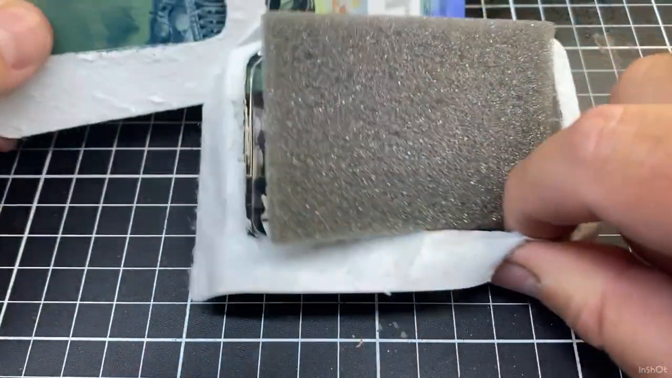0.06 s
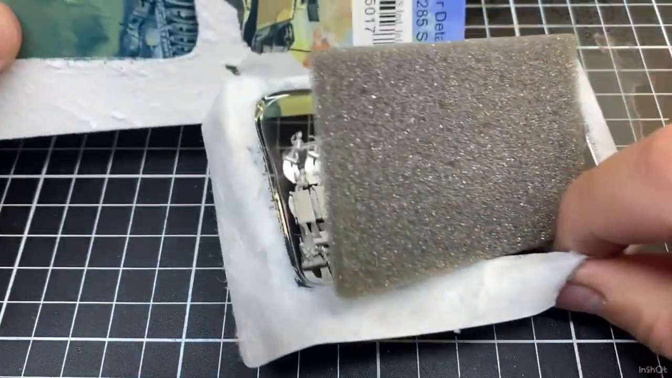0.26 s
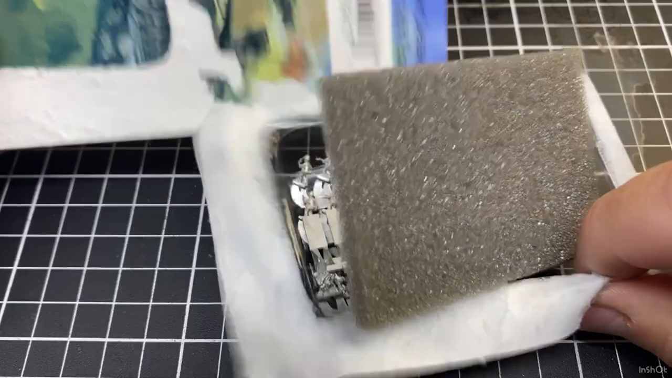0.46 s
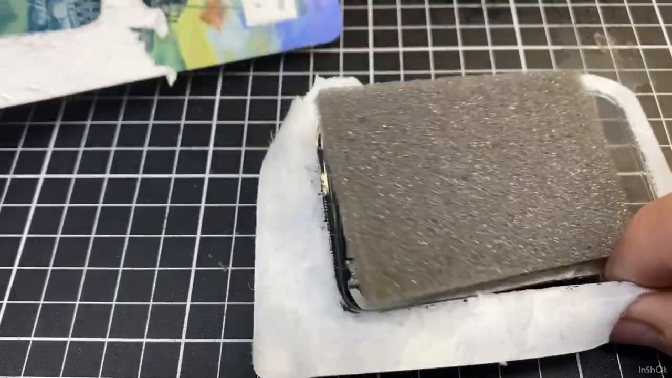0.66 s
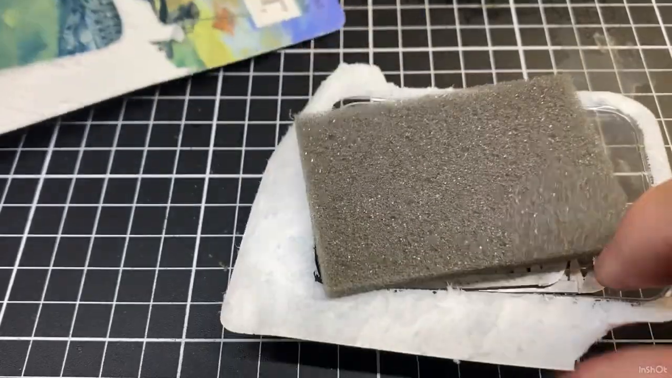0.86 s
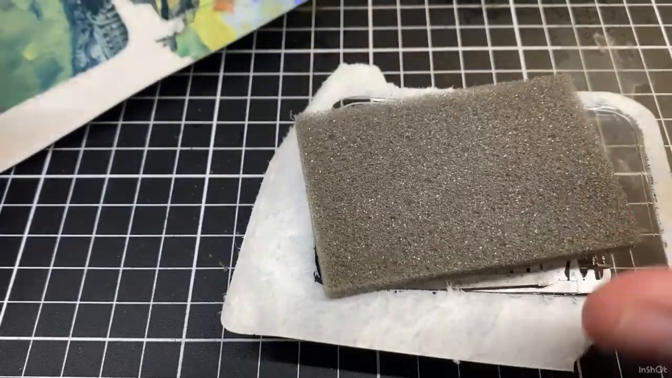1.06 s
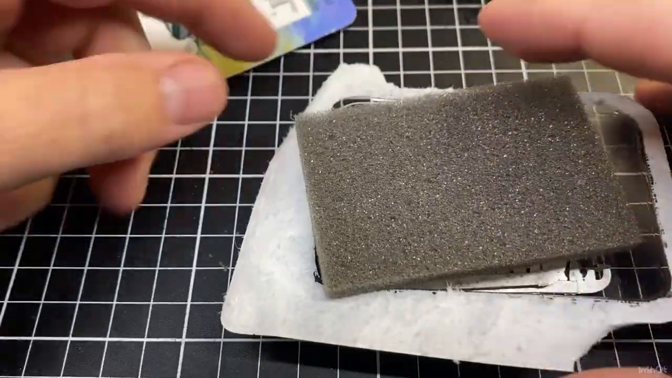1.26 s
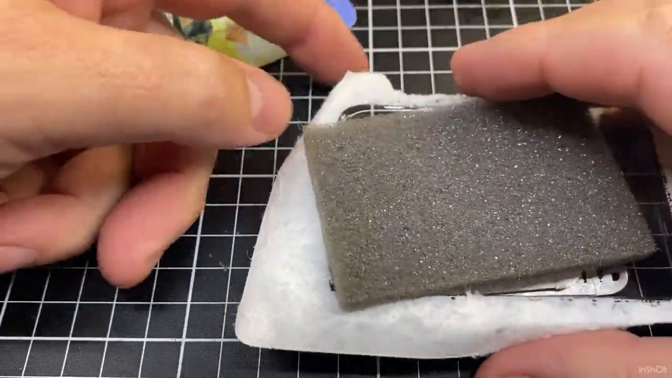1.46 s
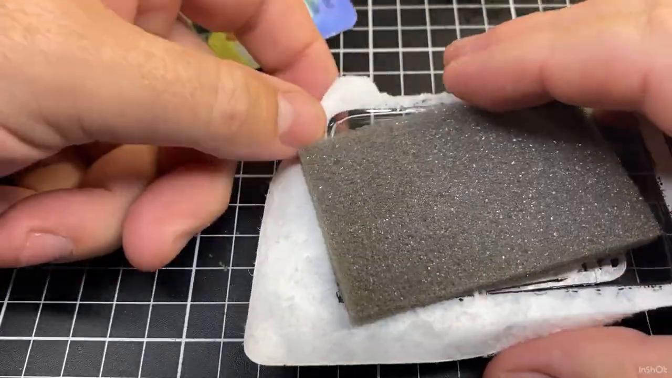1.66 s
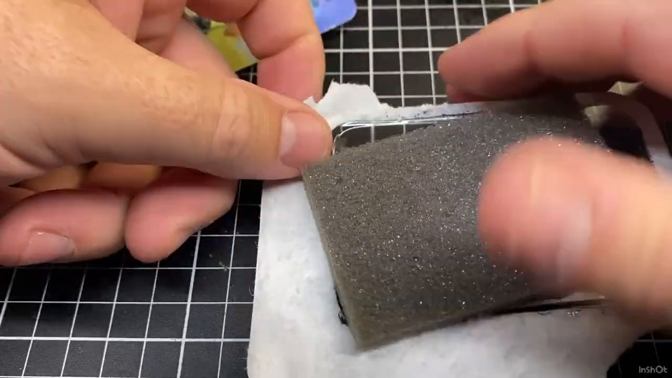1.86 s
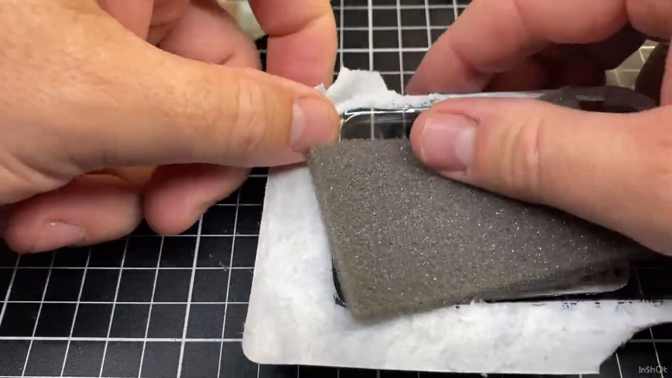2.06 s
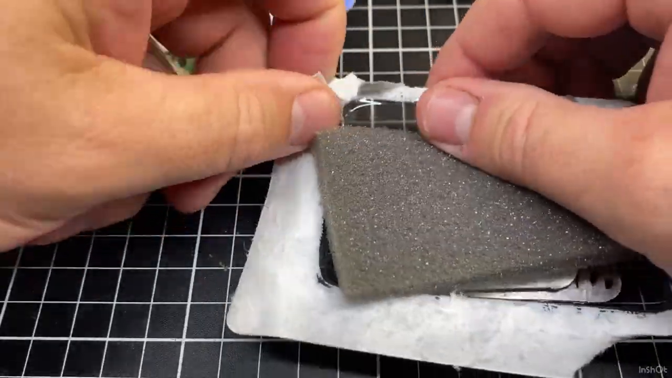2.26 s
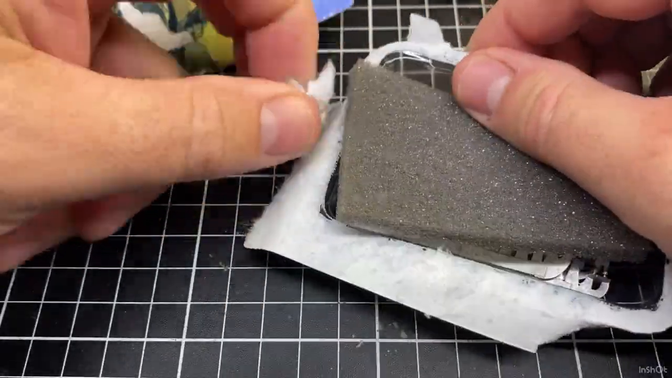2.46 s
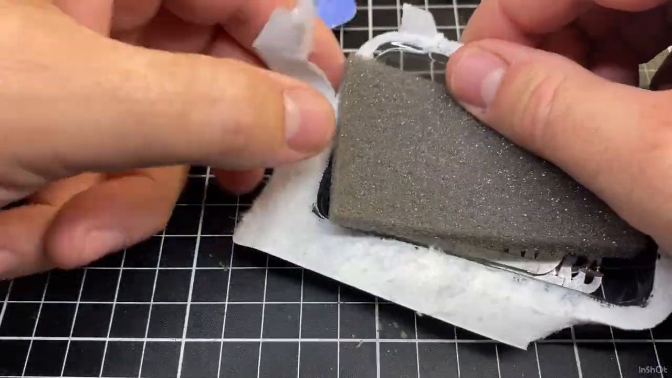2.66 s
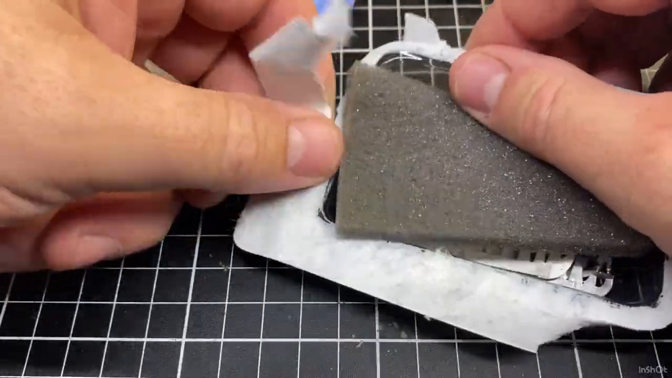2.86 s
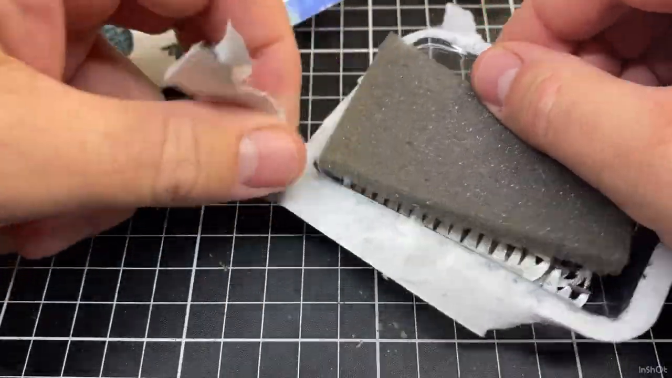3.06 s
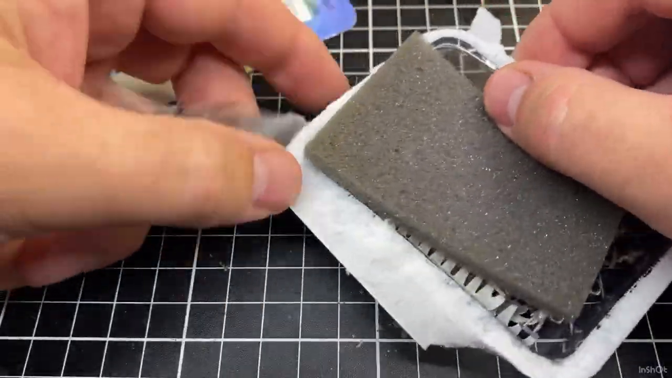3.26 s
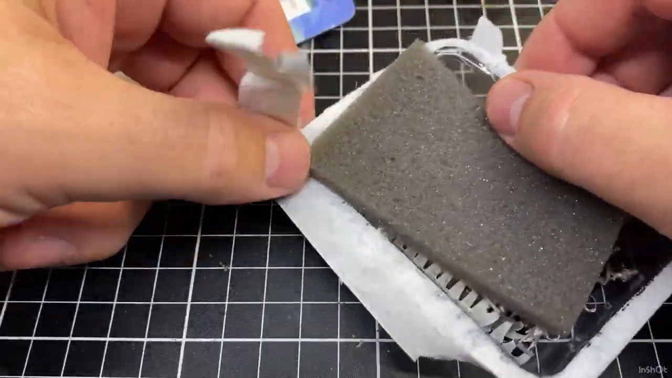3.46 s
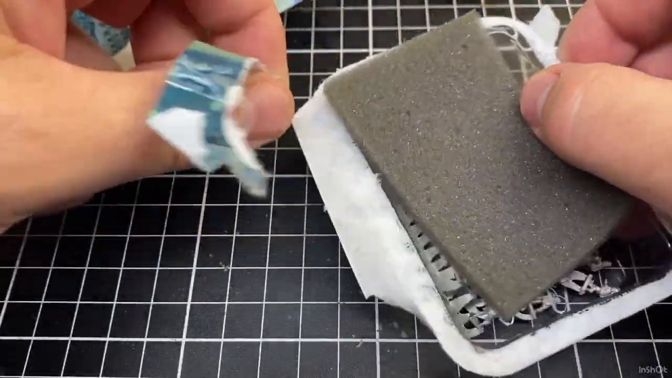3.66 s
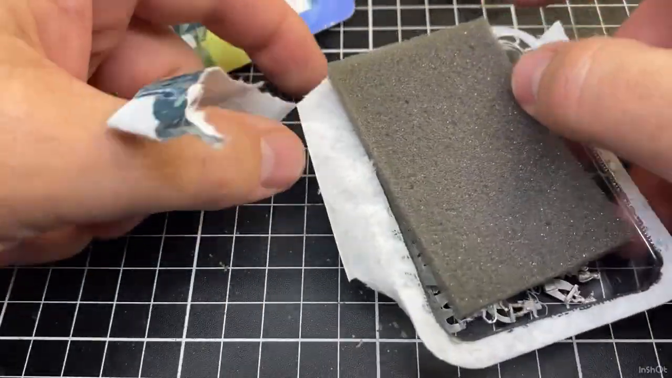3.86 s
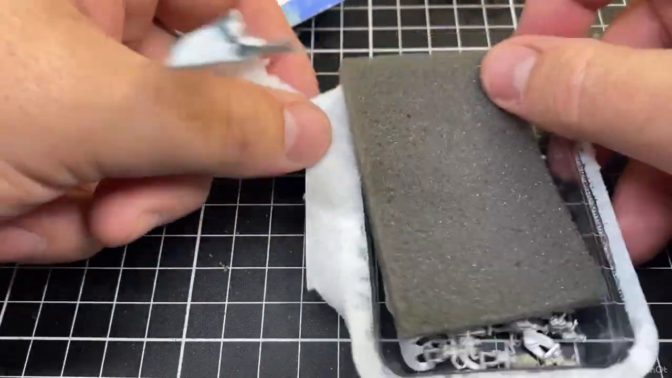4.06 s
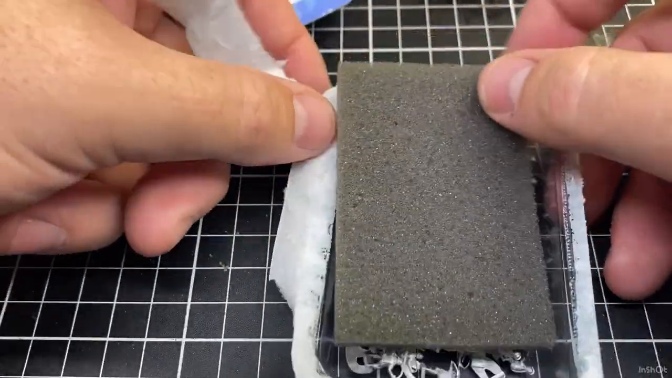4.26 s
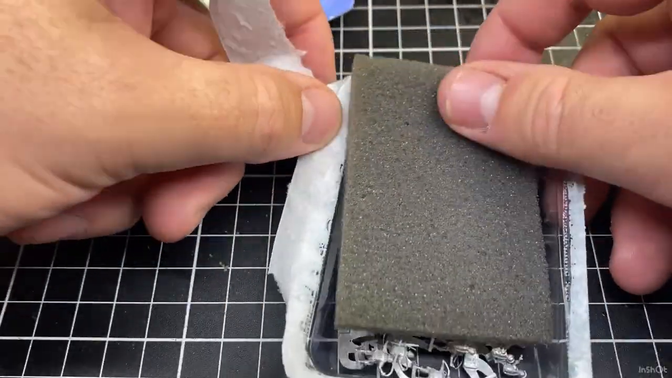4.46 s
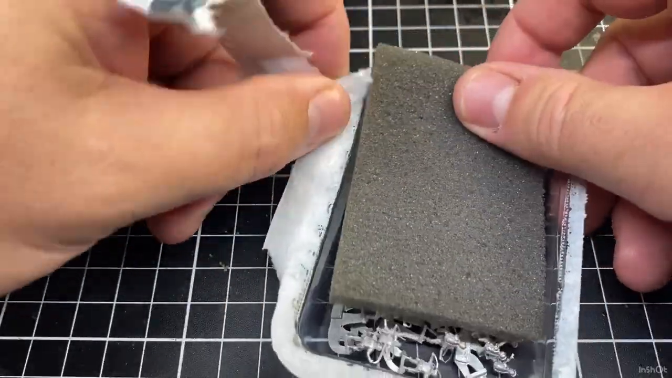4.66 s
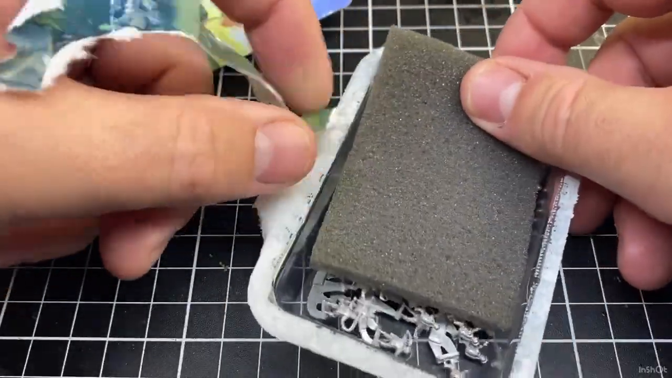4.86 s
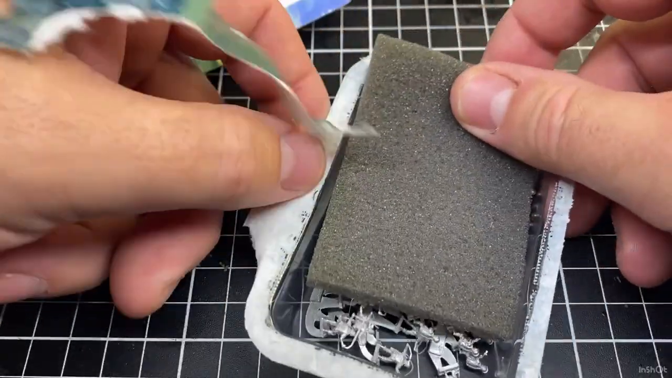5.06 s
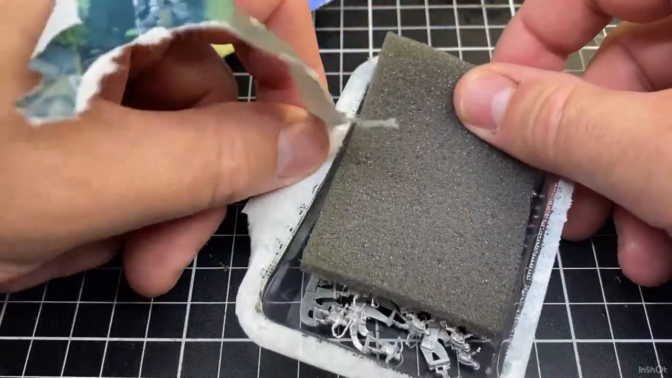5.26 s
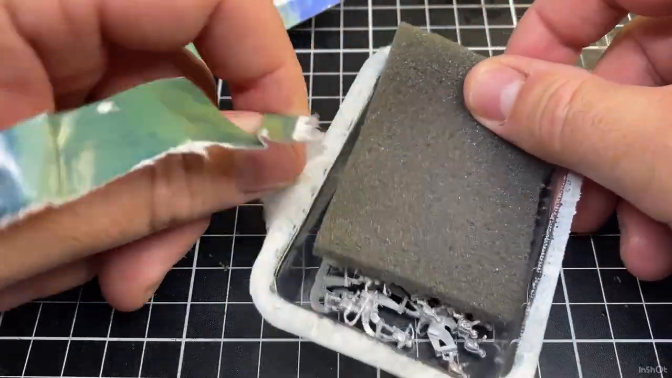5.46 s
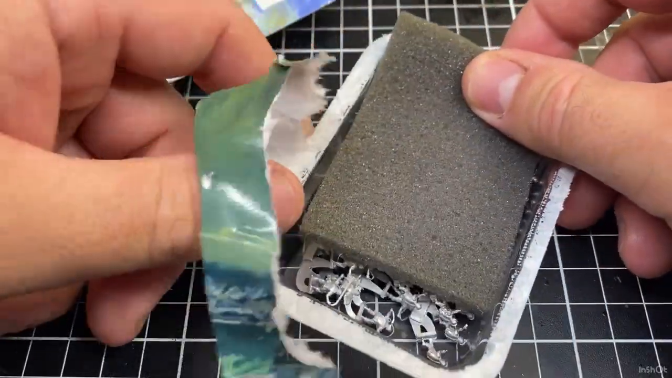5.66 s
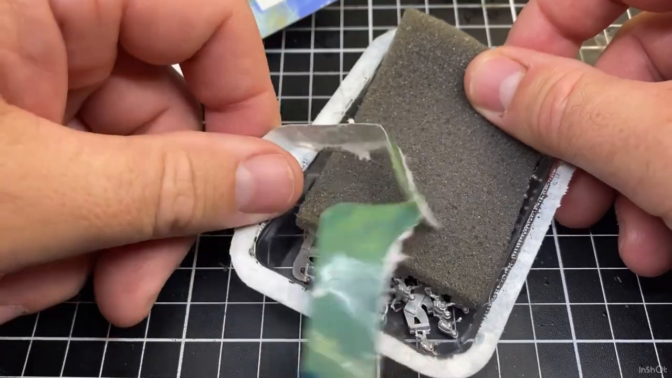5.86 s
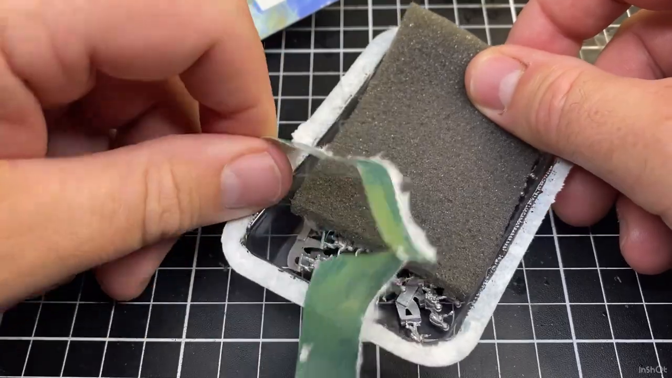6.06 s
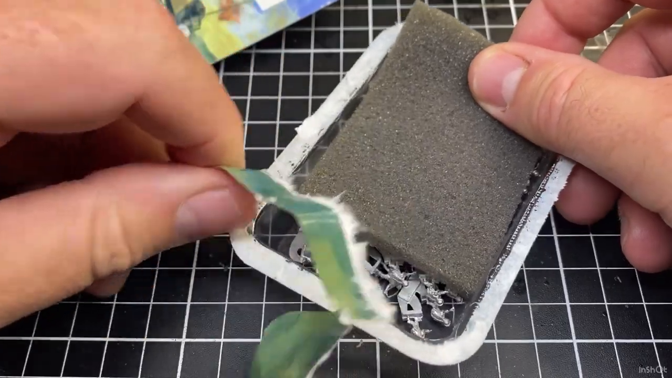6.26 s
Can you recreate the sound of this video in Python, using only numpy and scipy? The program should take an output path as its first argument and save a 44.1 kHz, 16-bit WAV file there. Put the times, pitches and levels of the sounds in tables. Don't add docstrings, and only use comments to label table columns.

```python
import sys
import numpy as np
from scipy import signal
from scipy.fft import rfft, irfft, next_fast_len
from scipy.io import wavfile
from scipy.ndimage import uniform_filter1d, map_coordinates

SR = 44100
rng = np.random.default_rng(int(sys.argv[2]) if len(sys.argv) > 2 else 0)


def decibels_to_gain(level_db):
    exponent = np.asarray(level_db, float) / 20
    return 10 ** exponent


def int16_out(signal):
    q = np.round(np.clip(np.atleast_2d(signal).T, -1, 1) * 32767)
    wavfile.write(sys.argv[1], SR, q.astype(np.int16))


N = 277830

# f/Hz, density/dB
ROOM_FLOOR = [(15, -33.5), (25, -11.5), (53, 7.5), (74, -9.5), (108, 1), (161, -23), (195, -10.5),
              (229, -42.5), (293, -9.5), (326, -42.5), (439, -32.5), (476, -27.5), (16000, -59)]
# t/s, level/dB
RUMBLE_SWAY = [(0, 5.5), (1.2, 1), (1.7, -5), (2.0, -5), (2.3, 7), (2.9, -6), (3.15, 4), (3.45, 6.5),
               (3.7, -3), (4.1, -0.5), (4.7, -1), (5.15, -7), (5.5, -3), (6.3, -2.5)]
# f/Hz, width/Hz, level/dB
HUM_MODES = [(95.8, 62, 1.5), (293, 4.4, 1)]
# t/s, level/dB
DRONE_LEVEL = [
    (0, -57.5),
    (1.1, -67.5),
    (3.4, -61),
    (3.9, -55.5),
    (4.7, -72),
    (6.3, -78),
]
# f/Hz, t60/s
ROOM_DECAY = [(200, 0.16), (2000, 0.5), (8000, 0.047), (15000, 0.19)]

# t/s, peak level/dB, f/Hz, t60/s
TRAY_BUMPS = [(0.004, -37, 75.5, 0.23), (0.077, -34, 117, 0.11), (0.189, -41.5, 66, 0.39),
              (0.278, -29.5, 83.4, 0.057), (0.365, -34.5, 82.5, 0.15), (0.472, -22, 77.5, 0.12),
              (0.509, -23, 49.7, 0.17), (0.568, -40.5, 53.8, 0.12), (0.712, -48.5, 65, 0.31),
              (0.849, -36.5, 60, 0.2), (0.938, -35.5, 54.1, 0.085), (3.538, -40, 59.2, 0.15),
              (3.743, -41.5, 88.8, 0.11), (5.421, -44.5, 59.2, 0.14), (.714, -38.5, 140, 0.086),
              (.365, -36, 169.7, .08), (.19, -41, 151.5, .1), (0.733, -44.5, 63.5, 0.27),
              (3.758, -46, 198, .12), (.813, -46.5, 91, .15), (0.927, -44, 146, 0.12),
              (1.813, -49, 106, 0.13), (2.708, -50, 62, 0.24), (2.845, -46, 190, 0.14),
              (3.137, -48, 77, 0.21), (4.083, -44, 51.4, .2), (4.579, -46, 104, 0.15),
              (5.419, -53, 252, 0.043)]
# f/Hz, density/dB
DRAG_TONE = [(60, -16.5), (150, 0), (300, 2), (600, -11), (1200, -44.5)]

# t/s, peak level/dB, brightness/dB per octave
CARD_KNOCKS = [
    (.806, -33.5, -2),
    (.882, -33, -3.5),
    (0.898, -37, 0.5),
    (0.923, -31, -5),
    (.934, -25.5, 1),
    (.943, -24, 0.5),
]
# f/Hz, level/dB, t60/s
LOOSE_CARD_MODES = [(980, -2, .018), (1280, -7, .015), (1650, 0, .015), (2100, 0, .015), (2400, -5, .014),
                    (2750, -8, .014), (3300, -9, .013), (4300, -18, .01)]
# t/s, peak level/dB, f/Hz,
# t60/s
TRAY_TAPS = [(1.5735, -32, 860, 0.019), (1.585, -30, 770, 0.013), (1.593, -31, 845, 0.018),
             (1.605, -30.5, 860, 0.022), (1.817, -26.5, 1250, 0.026), (1.818, -37.5, 550, 0.023),
             (4.382, -54.5, 910, 0.035), (4.495, -53, 900, .02), (4.5702, -36, 410, 0.048),
             (4.755, -44, 780, 0.023), (4.765, -43, 490, 0.023), (4.805, -44.5, 783, 0.022),
             (4.836, -42, 770, 0.017), (4.885, -35, 900, 0.01), (5.64, -27, 5740, 0.016),
             (5.645, -24, 1560, 0.021), (2.402, -41, 840, 0.015), (2.2, -46.5, 430, 0.051),
             (1.627, -37, 890, 0.021), (1.329, -52, 2000, 0.02), (1.764, -40, 945, 0.04),
             (4.132, -30.5, 960, 0.011), (3.157, -38, 2840, 0.017), (4.572, -37, 615, .03)]

# t/s, peak level/dB, tray ring level/dB, ring f/Hz, fizz level/dB
CARD_BREAKS = [(.0064, -14, -10, 1570, -9.5), (0.034, -30.5, -16.5, 3480, 0.5),
               (0.074, -12, -12, 3580, -6.5), (0.175, -23.5, -27.5, 3890, -15),
               (0.3634, -22.5, -6, 740, -5.5), (0.41, -23, -15.5, 1400, -6.5),
               (0.4286, -19.5, -10.5, 876, -5.5), (0.471, -5.5, -6.5, 1350, -8.5),
               (0.473, -10.5, -15, 3080, -6), (0.5462, -16, -9.5, 2460, -19), (0.7091, -32, -1, 963, -12.5),
               (.8405, -19, -12, 2640, -13.5)]
# t/s, peak level/dB, ring level/dB, fizz level/dB, burst t60/s
WALL_SNAPS = [(1.5853, -34, -18, -13, 0.0077), (1.8172, -9.5, -42, -11.5, 0.0084),
              (2.4755, -36.5, -24, 0.5, 0.064), (2.918, -8, -14.5, -16.5, 0.013),
              (2.9417, -28.5, -36.5, -8, 0.015), (3.2692, -36, -10, 3, 0.022),
              (3.5935, -25.5, -4, -5, 0.0087), (3.676, -20, -18, -5, 0.0098),
              (3.7402, -17.5, -6.5, -8, 0.016), (4.573, -12, -15.5, -5, 0.038),
              (4.615, -26, -21, -6.5, .013), (4.666, -23.5, -17, -3, 0.0058),
              (5.1921, -20, -21, -2.5, 0.024), (5.248, -14.5, -20, -1, 0.0074),
              (5.339, -30, -12, -28, 0.0095), (5.6477, -9.5, -12, -11, 0.01),
              (5.9574, -11.5, -14, -14.5, 0.0065), (5.9873, -19.5, -12.5, -7.5, 0.028),
              (6.1742, -15.5, -10, -8.5, 0.015)]
# t/s, peak level/dB, ring level/dB, fizz level/dB, burst t60/s
FLANGE_SNAPS = [(2.2034, -12.5, -5, -5, 0.018), (2.3167, -30, -19, -13, 0.022),
                (2.8522, -12.5, -12.5, -1, 0.025), (3.4277, -21.5, -44, -11.5, 0.0086),
                (3.4835, -13.5, -25, -4, 0.011), (3.5395, -19.5, -13.5, -5, 0.022),
                (3.6561, -28, -33, -1, 0.022), (3.9842, -23.5, -13.5, -11.5, 0.02),
                (4.2044, -30.5, -32, -21, 0.0094), (4.5699, -15.5, -26, -11, 0.0094),
                (4.7033, -25, -15.5, -6.5, 0.033), (5.1721, -41.5, -30, 13, 0.011),
                (5.3021, -25, -22, -6, 0.012), (5.3946, -19.5, -26, 4.5, .008),
                (5.4258, -9, -9, -6.5, 0.0094), (5.8057, -33.5, -6, 0.5, 0.021),
                (5.9783, -15, -3.5, -8.5, 0.0043), (6.1015, -39.5, -30, -4.5, 0.019),
                (6.2163, -26, -11, -19.5, .012), (6.2744, -20.5, -8.5, -11.5, 0.035)]
# t/s, peak level/dB
RIP_TICKS = [(2.2131, -12), (2.2201, -10.5), (2.242, -15), (2.2784, -22), (2.341, -9.5), (0.456, -21.5),
             (2.293, -13), (2.811, -27.5), (3.547, -12), (3.64, -28), (2.818, -14.5), (2.882, -29),
             (3.4775, -22), (5.4705, -10)]
# t/s, peak level/dB, ring f/Hz
FIBRE_SPIKES = [(0.0448, -21.5, 5200), (0.0511, -18, 6700), (0.2575, -23.5, 3430), (0.2692, -23.5, 3660),
                (0.2845, -18, 3560), (0.782, -44, 2584), (2.3166, -16.5, 7030), (2.3216, -13.5, 6450),
                (2.3665, -19.5, 7100), (2.377, -12.5, 6350), (2.3834, -15.5, 6700), (2.4023, -18, 6780),
                (2.4055, -21, 6200), (2.8951, -20, 3400), (2.9773, -15, 4100), (3.1124, -39.5, 3310),
                (3.1228, -30, 6750), (3.4054, -26.5, 3150), (3.5594, -16, 6470), (3.6094, -23, 5330),
                (4.219, -23.5, 4800), (4.2766, -40.5, 5480), (4.4894, -34.5, 2990), (5.1206, -27, 6900),
                (5.3725, -18.5, 6200), (5.4112, -16, 2900), (5.4326, -15, 3200), (5.4564, -15, 6050),
                (5.4894, -31, 3090), (6.0484, -26, 7130), (6.1474, -27.5, 5440), (6.2882, -18.5, 5470)]

# t/s, level/dB
HAND_HOLD = [(0, -42.5), (.36, -49), (.45, -61), (.92, -71), (.99, -74.5), (1.19, -96.5), (1.29, -88.5),
             (1.31, -65), (1.54, -74.5), (1.98, -68.5), (2.09, -59.5), (2.54, -65.5), (2.62, -60),
             (3.91, -73), (3.98, -61), (4.33, -69), (4.56, -60.5), (4.96, -76)]
# t/s, length/s, start level/dB, end level/dB
STEADY_TEARS = [(.02, .064, -57.5, -33), (.084, .08, -35.5, -49.5), (.164, 0.099, -37.5, -44),
                (.255, 0.05, -38, -39), (.408, 0.029, -43, -43.5), (.455, 0.04, -39.5, -40),
                (.471, 0.057, -22, -27.5), (1.544, 0.049, -79, -50), (1.669, .06, -53.5, -60.5),
                (1.729, 0.08, -46, -57), (2.092, .112, -62.5, -46), (2.232, .12, -42, -33),
                (2.304, .106, -26.5, -32), (2.73, 0.14, -57.5, -43.5), (2.945, .097, -41.5, -40),
                (3.357, 0.14, -50, -56), (3.477, .056, -44, -41), (3.53, 0.014, -36, -29),
                (3.625, .055, -43.5, -42), (.3, 0.07, -48, -45.5), (3.984, .031, -46, -42.5),
                (4.015, .131, -57, -51), (4.202, .124, -50.5, -57), (4.562, 0.014, -49, -23),
                (4.678, 0.097, -42.5, -36.5), (5.0, 0.071, -61.5, -49.5), (5.168, .157, -51.5, -38.5),
                (5.325, .1, -42, -36), (5.425, .049, -30, -30), (5.587, .068, -54.5, -36),
                (5.779, .076, -60, -48.5), (6.102, .166, -46, -41), (6.268, 0.035, -43, -39)]
# t/s, start level/dB, fall/dB per s
SUDDEN_SLIPS = [(0, -29.5, 774.5), (0.359, -31.5, 479.5), (0.525, -39, 169), (.701, -61.5, 17),
                (0.84, -42, 261), (1.396, -64, 87.5), (1.595, -50, 308), (1.813, -45.5, 352),
                (1.872, -62.5, 88), (2.205, -37, 317), (2.41, -44, 243), (2.474, -47.5, 285),
                (2.613, -44, 215), (2.822, -46.5, 25), (3.039, -53.5, 26), (3.264, -43.5, 225),
                (3.546, -28.5, 477), (3.592, -31.5, 297), (3.74, -37.5, 406), (3.77, -58.5, 127),
                (4.575, -34, 278), (4.763, -42, 378), (4.828, -51.5, 231), (5.1, -46.5, 212),
                (5.476, -37, 447), (5.515, -55.5, 97), (5.654, -54.5, 105), (5.855, -63, 147.5),
                (5.983, -44, 66), (6.038, -39.5, 254), (0.781, -53, 450), (0.949, -64.5, 125),
                (1.305, -66.5, 119.5), (3.68, -49, 167), (5.07, -53.5, 58), (.44, -49, 100)]
# t/s, tray level/dB, tension level/dB
TRAY_GRIP = [(0, -3.5, -5), (.47, -1, 0.5), (.56, 2.5, -5.5), (.92, -0.5, -6), (1.58, 2.5, -2),
             (1.69, -7, -4.5), (1.83, 6, -3), (2.15, -4.5, 6.5), (2.36, -13.5, -7), (2.5, -5, -6),
             (3.0, -0.5, 1.5), (3.6, -4.5, -2.5), (3.85, 3.5, -2), (4.6, -7.5, 3), (4.9, -1.5, -4),
             (5.25, -14, 5.5), (5.52, -0.5, -5), (6.15, -9.5, 2)]
# t/s, length/s, f/Hz, level over the paper/dB
STRIP_TONES = [(0.172, .07, 1630, -8.5), (0.258, 0.051, 3700, -4.5), (.26, .04, 1510, -4),
               (0.355, .03, 600, -7.5), (0.479, 0.038, 2880, -8.5), (2.211, .03, 3200, 6),
               (2.293, 0.064, 1800, -6.5), (2.33, 0.082, 6960, -1), (2.967, 0.077, 3000, -4),
               (3.533, .04, 4050, -6), (3.592, 0.045, 4200, -4.5), (3.613, 0.067, 1160, -5),
               (4.696, 0.043, 1410, -1), (4.726, 0.041, 2200, -5), (5.232, 0.045, 980, -8),
               (5.41, 0.069, 2970, -6), (6.133, .04, 5560, -14), (6.198, .1, 3150, -4),
               (1.302, 0.089, 1790, 0.5), (0.949, .12, 1950, 4), (1.736, .05, 2000, -1),
               (2.78, .04, 2320, -1)]
# f/Hz, density/dB
PAPER_TONE = [(2500, -42), (4200, -17), (5200, -4), (7400, 0), (8500, 5.5), (9500, -6), (11000, -26)]
# f/Hz, density/dB
FIZZ_TONE = [(7500, -30), (9500, 1), (11000, 1), (12200, 0.5), (14000, -0.5), (15700, -4), (16700, -27.5)]
# f/Hz, width/Hz, level/dB
LOW_TRAY_MODES = [(802, 380, 3), (1015, 302, 6.5), (1470, 736, 0.5), (2080, 580, 3.5)]
# f/Hz, width/Hz, level/dB
HIGH_TRAY_MODES = [(2556, 884, -1.5), (3308, 650, 0.5), (3900, 1120, -5)]

# f/Hz, likeness/0-1
PORT_LIKENESS = [(60, .97), (220, .7), (1000, .4), (1800, .4), (3000, .65), (5500, .6), (6700, .95),
                 (7600, .8), (8500, 1), (9600, 1), (10500, .8), (11900, 1), (12900, 1), (13800, .7),
                 (14700, 1)]
# f/Hz, lead/rad
PORT_LEAD = [(0, 0), (300, -.5), (5900, -.4), (6500, 0), (6900, .2), (7300, 1.4), (8500, np.pi),
             (9600, np.pi), (10000, 4), (11900, 2 * np.pi), (12900, 2 * np.pi), (13400, 7.4),
             (14700, 3 * np.pi)]
# f/Hz, level/dB
PORT_TILT = [(60, -2), (200, -6), (700, -8.5), (1300, -3), (3000, -7), (5200, -6), (6500, -1), (8000, 0)]


def unit(x):
    return x / np.sqrt(np.mean(x ** 2) + 1e-20)


def noise():
    return rng.standard_normal((2, N))


def span(s, length):
    return slice(round(s * SR), round((s + length) * SR))


def along(points, hz):
    f, value = np.transpose(points)
    return np.interp(np.log(hz + 1), np.log(f + 1), value)


def spectrum(points):
    return lambda hz: decibels_to_gain(along(points, hz))


def curves(rows):
    s, *columns = np.transpose(rows)
    return [np.interp(np.arange(N) / SR, s, column) for column in columns]


def filtered(x, response):
    m = next_fast_len(N + SR // 8)
    return irfft(rfft(x, m) * response(np.fft.rfftfreq(m, 1 / SR)), m)[..., :N]


def resonances(modes):
    def response(f):
        total = 0
        for k, (centre, width, db) in enumerate(modes):
            loss = 1j * f * width
            total = total + (-1) ** k * decibels_to_gain(db) * loss / (centre ** 2 - f ** 2 + loss)
        return total
    return response


def wobble(rate):
    knots = rng.standard_normal(int(N * rate / SR) + 4)
    return map_coordinates(knots, [np.arange(N) * rate / SR])


def ringing(t, hz, t60, spread, rise_s):
    partials = hz * np.exp(spread * rng.uniform(.5, 1.7, 3) * [0, -1, 1])
    phases = rng.uniform(0, 2 * np.pi, (2, 3, 1))
    swing = np.sin(2 * np.pi * partials[:, None] * t + phases) * decibels_to_gain([[0], [-4], [-6]])
    return swing.sum(1) * decibels_to_gain(-60 * t / t60) * (1 - np.exp(-t / rise_s))


def pulls():
    slip_s = .2
    t = np.arange(N) / SR
    paper_db, = curves(HAND_HOLD)
    slips = [(s, slip_s, db, db - fall * slip_s) for s, db, fall in SUDDEN_SLIPS]
    for s, length, start_db, end_db in STEADY_TEARS + slips:
        at = span(s, length)
        stroke_db = start_db + (end_db - start_db) * (t[at] - s) / length
        paper_db[at] = np.maximum(paper_db[at], stroke_db)
    paper_db = uniform_filter1d(paper_db, size=160)
    tray_db, taut_db = curves(TRAY_GRIP)
    shaken_db = paper_db - 0.017 * (paper_db + 55.5)
    low_db = shaken_db + 1.015 * tray_db
    return paper_db, low_db, shaken_db + tray_db, paper_db + taut_db


def air():
    floor_db = -58.5
    floor = unit(filtered(noise(), spectrum(ROOM_FLOOR)))
    deep = filtered(floor, lambda hz: hz < 82)
    swaying = floor + (decibels_to_gain(curves(RUMBLE_SWAY)[0]) - 1) * deep
    hum = unit(filtered(noise(), lambda hz: resonances(HUM_MODES)(hz) ** 2))
    drone = unit(filtered(noise(), spectrum(DRAG_TONE)))
    return decibels_to_gain(curves(DRONE_LEVEL)[0]) * drone + decibels_to_gain(floor_db) * swaying + decibels_to_gain(floor_db - 7.5) * hum


def room(x):
    hz, t, z = signal.stft(rng.standard_normal((2, SR // 2)), SR, nperseg=256)
    fade = decibels_to_gain(-60 * t / along(ROOM_DECAY, hz)[:, None])
    tail = signal.istft(z * fade, SR, nperseg=256)[1]
    delayed = np.pad(x, ((0, 0), (300, 0)))
    return signal.fftconvolve(delayed, tail / np.linalg.norm(tail[0]), axes=1)[:, :N]


def bumps():
    boom, puff = np.zeros((2, 2, N + SR))
    t = np.arange(SR // 3) / SR
    for s, db, hz, t60 in TRAY_BUMPS:
        at = slice(round(s * SR), round(s * SR) + len(t))
        fade = decibels_to_gain(db - 60 * t / t60) * (1 - np.exp(-t / 0.0011))
        phase = rng.uniform(0, 2 * np.pi, (2, 1))
        boom[:, at] += decibels_to_gain([[0.5], [-8]]) * fade * np.sin(2 * np.pi * hz * t + phase)
        puff[:, at] += decibels_to_gain(12.5) * fade * decibels_to_gain(-60 * t / 0.44) * rng.standard_normal((2, len(t)))
    return boom[:, :N] + filtered(puff[:, :N], spectrum(DRAG_TONE))


def drag():
    low_db = pulls()[1]
    return filtered(decibels_to_gain(0.83 * low_db - 2.0) * noise(), spectrum(DRAG_TONE))


def knocks():
    out = np.zeros((2, N + SR))
    t = np.arange(SR // 15) / SR
    hz, level_db, t60 = np.transpose(LOOSE_CARD_MODES)[:, :, None]
    for s, db, bright_db in CARD_KNOCKS:
        tune, size, *phases = rng.standard_normal((4, len(hz), 1))
        mode_db = db + level_db + 2.9 * size + bright_db * np.log2(hz / 1600)
        swing = np.sin(2 * np.pi * hz * (1 + 0.03 * tune) * t + np.array(phases))
        hit = (decibels_to_gain(mode_db - 60 * t / t60) * swing).sum(1)
        out[:, round(s * SR):][:, :len(t)] += hit * (1 - np.exp(-t / 0.00031))
    return out[:, :N]


def taps():
    out = np.zeros((2, N + SR))
    t = np.arange(SR // 20) / SR
    for s, db, hz, t60 in TRAY_TAPS:
        ring = ringing(t, hz, t60, spread=0.12, rise_s=0.0014)
        out[:, round(s * SR):round(s * SR) + len(t)] += decibels_to_gain(db + 3.0) * ring
    return out[:, :N]


def releases():
    wall_hz, flange_hz, scatter = 1014, 3265, 0.045
    spot = lambda hz: hz * np.exp(scatter * rng.standard_normal())
    card = [(*row, 0.015) for row in CARD_BREAKS]
    rim = []
    for rows, hz in ((WALL_SNAPS, wall_hz), (FLANGE_SNAPS, flange_hz)):
        rim += [(s, db, ring_db, spot(hz), fizz_db, t60) for s, db, ring_db, fizz_db, t60 in rows]
    ticks = [(s, db, -14, spot(flange_hz), -6.5, 0.0061) for s, db in RIP_TICKS]
    spikes = [(s, db + 1, -10, hz, -5.5, .005) for s, db, hz in FIBRE_SPIKES]
    return card + rim + ticks + spikes


def snaps():
    lead_s, lead_db, lead_rise_s = .006, -19, .0015
    burst, fizz, knock, ring = np.zeros((4, 2, N + SR))
    t = np.arange(SR // 20) / SR
    swell = np.exp(-t[t < lead_s][::-1] / lead_rise_s)
    for s, db, ring_db, hz, fizz_db, t60 in releases():
        at = slice(round(s * SR), round(s * SR) + len(t))
        before = slice(at.start - len(swell), at.start)
        fade = decibels_to_gain(-60 * t / t60) * (1 - np.exp(-t / (0.15 * t60)))
        grains = rng.standard_normal((3, 2, len(t)))
        burst[:, before] += decibels_to_gain(db + lead_db + 2) * swell * grains[0, :, -len(swell):]
        fizz[:, before] += decibels_to_gain(db + fizz_db + lead_db + 8.5) * swell * grains[1, :, -len(swell):]
        burst[:, at] += decibels_to_gain(db + 5.0) * fade * grains[0]
        fizz[:, at] += decibels_to_gain(db + fizz_db + 11.0) * fade ** 1.065 * grains[1]
        knock[:, at] += decibels_to_gain(db + ring_db + 2) * fade ** 0.28 * grains[2]
        ring[:, at] += decibels_to_gain(db + ring_db - 3.5) * ringing(t, hz, 2.35 * t60, spread=0.28, rise_s=0.00072)
    body = lambda hz: spectrum(PAPER_TONE)(hz) + resonances(HIGH_TRAY_MODES)(hz)
    cracks = filtered(burst[:, :N], body) + filtered(fizz[:, :N], spectrum(FIZZ_TONE))
    return cracks + filtered(knock[:, :N], resonances(LOW_TRAY_MODES)) + ring[:, :N]


def prickle():
    count, over_tear_db, t60 = 900, 14, .0015
    at, size = rng.random((2, count))
    t = np.arange(SR // 100) / SR
    clicks = np.bincount((at * N).astype(int), decibels_to_gain(-12 * size), N)
    gate = signal.fftconvolve(clicks, decibels_to_gain(-60 * t / t60))[:N]

    def body(hz):
        tray = resonances(HIGH_TRAY_MODES + LOW_TRAY_MODES)(hz)
        return spectrum(PAPER_TONE)(hz) + decibels_to_gain(0.5) * spectrum(FIZZ_TONE)(hz) + decibels_to_gain(-1.5) * tray

    return decibels_to_gain(pulls()[0] + over_tear_db) * filtered(gate * noise(), body)


def crackle(spread_db, life, bed_db, clump_db):
    starts = rng.integers(0, N, 3000)
    sizes = np.minimum(rng.exponential(1, 3000), 3.5)
    breaks = np.bincount(starts, decibels_to_gain(spread_db * sizes), N) * decibels_to_gain(clump_db * wobble(60))
    decays = signal.lfilter([1], [1, -np.exp(-1 / (life * SR))], breaks)
    gate = unit(uniform_filter1d(decays, size=20))
    return unit((gate + decibels_to_gain(bed_db)) * noise())


def strip(fibres):
    out = np.zeros((2, N))
    for s, length, hz, db in STRIP_TONES:
        at = span(s, length)
        tone = signal.lfilter(*signal.iirpeak(hz, 5, SR), fibres[:, at])
        out[:, at] += decibels_to_gain(db) * unit(tone) * signal.windows.tukey(tone.shape[1], .5)
    return out


def peel():
    paper_db, low_db, high_db, fizz_db = pulls()
    fibres = crackle(spread_db=4, life=0.001, bed_db=0, clump_db=2.5)
    creases = crackle(spread_db=-0.5, life=.002, bed_db=-5, clump_db=3.5)
    shake = fibres + 0.97 * creases
    sheet = decibels_to_gain(paper_db + 0.5) * unit(filtered(fibres, spectrum(PAPER_TONE)))
    fizz = decibels_to_gain(fizz_db) * unit(filtered(fibres, spectrum(FIZZ_TONE)))
    low = decibels_to_gain(low_db + 0.5) * unit(filtered(shake, resonances(LOW_TRAY_MODES)))
    high = decibels_to_gain(high_db + 1.5) * unit(filtered(shake, resonances(HIGH_TRAY_MODES)))
    singing = decibels_to_gain(paper_db) * strip(shake)
    return sheet + fizz + low + high + singing


def crumpled(x, patchy_db, fine_db):
    z = signal.stft(x, nperseg=512)[2]

    def patch(bins, frames):
        grain = rng.standard_normal(z.shape[1:])
        return unit(uniform_filter1d(uniform_filter1d(grain, bins, 0), frames, 1))

    field_db = patchy_db * patch(9, 10) + fine_db * patch(2, 8)
    return signal.istft(z * unit(decibels_to_gain(field_db)), nperseg=512)[1][:, :N]


def ports(views, focus):
    def blend(hz):
        turn = np.arccos(np.clip(focus * along(PORT_LIKENESS, hz), -1, 1)) / 2
        return np.array([np.cos(turn), np.sin(turn)])

    def path(hz):
        half = np.array([[.5], [-.5]])
        lead = np.interp(hz, *np.transpose(PORT_LEAD))
        return decibels_to_gain(half * along(PORT_TILT, hz)) * np.exp(1j * half * lead)

    mid, side = filtered(views, blend)
    return filtered(np.array([mid + side, mid - side]), path)


def scene():
    rustle = crumpled(prickle() + peel(), patchy_db=2.0, fine_db=3.0) + bumps() + drag()
    rim = snaps() + taps()
    card = knocks()
    echo = decibels_to_gain(-20.5) * room(rustle + rim + decibels_to_gain(-4) * card)
    return ports(rustle + echo + air(), focus=.9997) + ports(rim + card, focus=.92)


def roll_off(x):
    return signal.sosfilt(signal.butter(12, 16650, fs=SR, output="sos"), x)


def record(dry):
    rounded = dry / (1 + np.abs(dry / .75) ** 4) ** (1 / 4)
    band = lambda hz: (hz < 16500) / (1 + (37 / (hz + 1)) ** 4)
    return roll_off(filtered(rounded, band))


dry = scene()
out = record(dry)
int16_out(out)
```